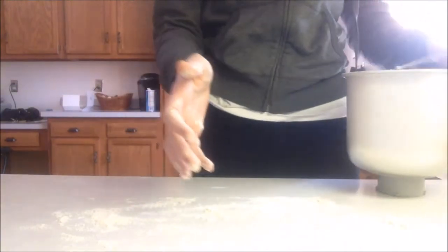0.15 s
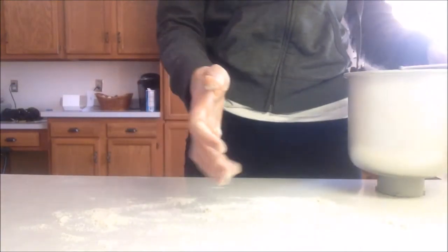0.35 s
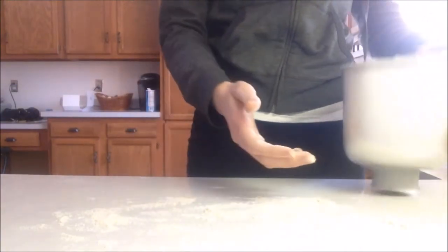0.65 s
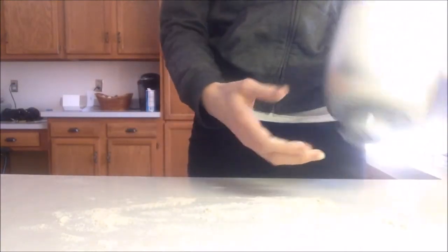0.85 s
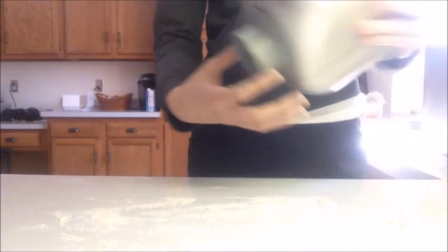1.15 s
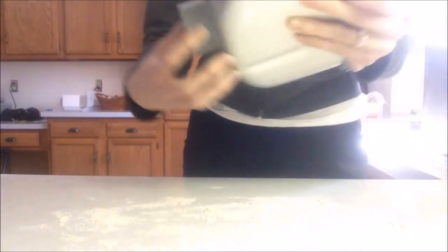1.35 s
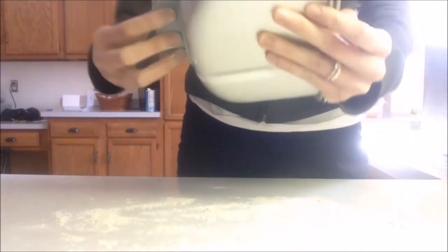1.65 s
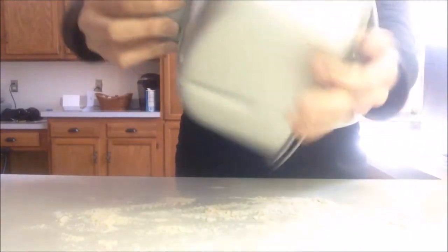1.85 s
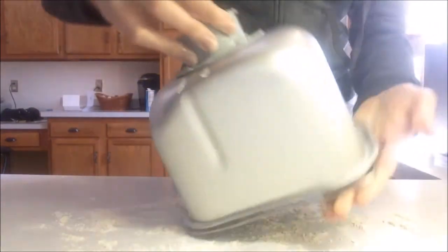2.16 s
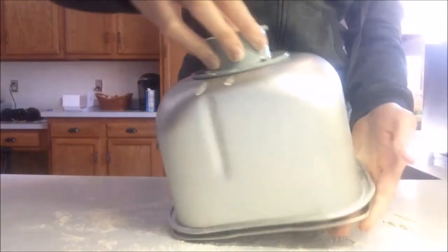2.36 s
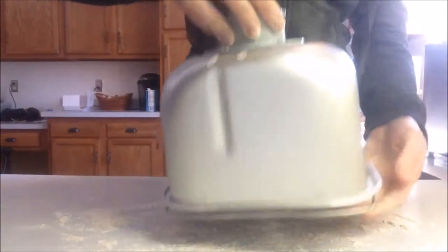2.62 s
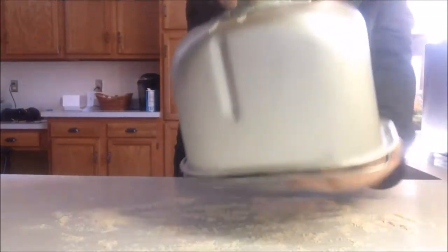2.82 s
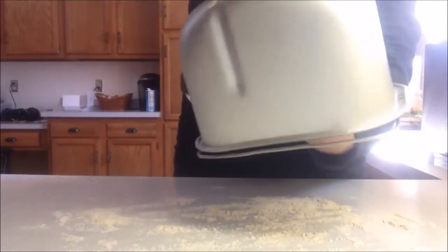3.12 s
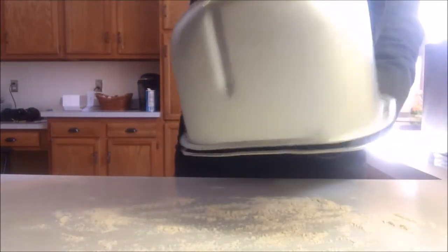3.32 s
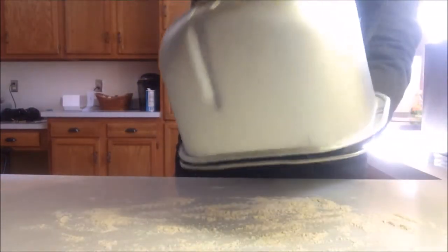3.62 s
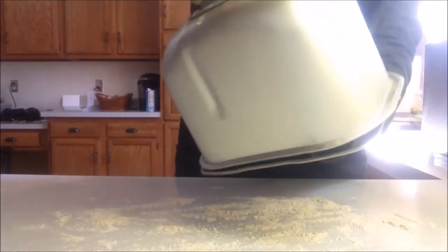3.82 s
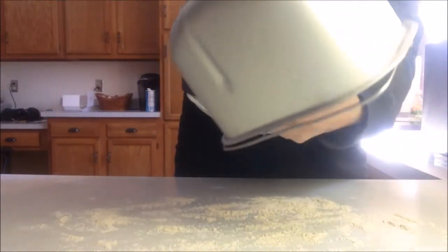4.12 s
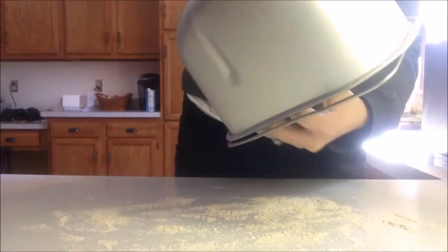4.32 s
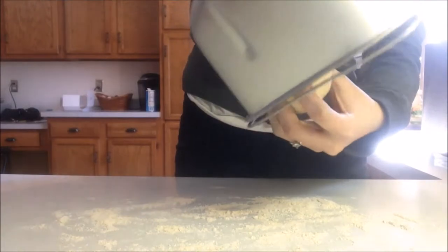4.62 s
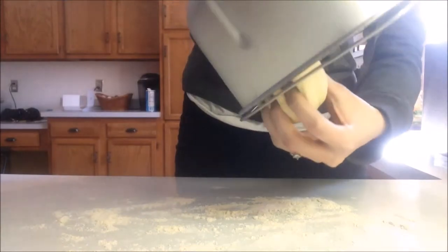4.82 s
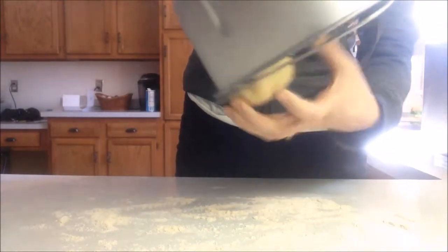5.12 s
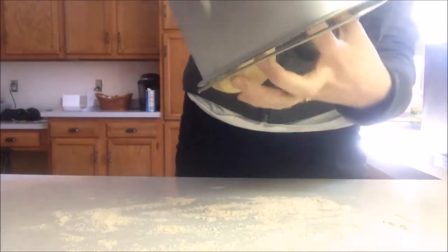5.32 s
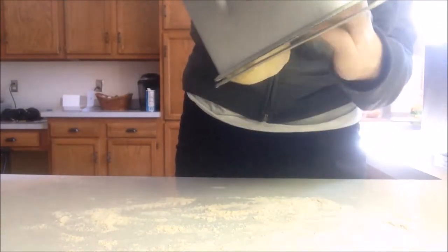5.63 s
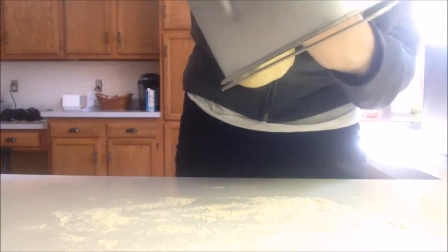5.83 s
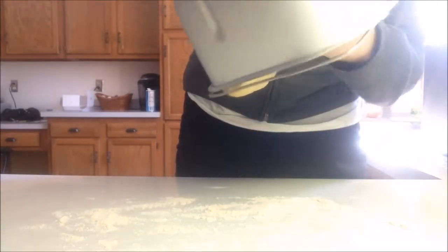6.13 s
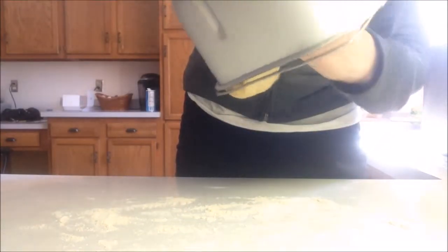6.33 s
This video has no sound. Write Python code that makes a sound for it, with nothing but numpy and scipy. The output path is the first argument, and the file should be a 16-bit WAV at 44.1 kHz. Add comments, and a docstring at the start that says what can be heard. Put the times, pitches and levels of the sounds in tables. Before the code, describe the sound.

Close-miked handling of a hollow metal bread pan: quick booming counter bumps with handle rattle first, soft rubbing and a tiny click, then dry grains of flour sifting in brief waves. A tight run of dull knocks and a short squeaky drag comes next, then near quiet. Finally sharp, ringing knocks and rubs end in soft taps. Steady low motor hum and fan noise lie underneath, in a small lightly reflective kitchen.

```python
"""A small kitchen with a humming appliance: a deep metal bread pan bumps on the counter and is turned over.
Loose flour slides down its wall, the dough slips onto a hand, and fingers work it free with knocks and clunks.
Bumps, knocks and clicks are damped thuds, ringing modes and noise bursts; rubs and short tones are resonant noise.
Flour is dense grains through wall resonances plus hiss; the hum is steady partials over coloured noise.
Diffuse reflections follow all the handling."""
import sys
import numpy as np
from scipy import signal
from scipy.fft import rfft, irfft, next_fast_len
from scipy.io import wavfile

SR = 44100
rng = np.random.default_rng(int(sys.argv[2]) if len(sys.argv) > 2 else 0)


def unload_audio(sound):
    """Save the sound as a 16-bit wav file, at the path given as the first command line argument."""
    columns = np.transpose(np.atleast_2d(sound))
    # keep every value between -1 and 1, then stretch to whole-number steps
    steps = np.round(np.clip(columns, -1, 1) * 32767)
    wavfile.write(sys.argv[1], SR, steps.astype(np.int16))


N = 285327
TIME = np.arange(N) / SR

# metal contact, body of the noise: f/Hz, relative density/dB
CLANK_SPECTRUM = [(350, -21), (900, -5), (1400, -3.5), (2000, -2), (3400, 0), (4500, -4.5), (5300, -15),
                  (7000, -13), (10000, -33)]
# metal contact, bright edge: f/Hz, relative density/dB
TICK_SPECTRUM = [(2000, -6), (4500, -19), (6700, 4), (8500, -8), (11000, -3.5), (15000, -18)]


def from_db(db):
    """Amplitude ratio of a level in dB."""
    return 10 ** (np.asarray(db) / 20)


def rms_one(x):
    """Scale to rms 1."""
    return x / np.sqrt(np.mean(x ** 2) + 1e-20)


def drift(points, size):
    """Random knots joined by straight lines, rms 1."""
    knots = rng.standard_normal(2000)
    return rms_one(np.interp(np.linspace(0, points, size), np.arange(2000), knots))


def flutter(per_s, depth_db):
    """A randomly wandering gain, rms 1."""
    return rms_one(from_db(depth_db * drift(per_s * N / SR, N)))


def noise(spectrum, ripple_db=0, spacing_hz=75):
    """Steady noise of a given colour, rms 1; crowded resonances ripple its spectrum."""
    hz, level_db = np.transpose(spectrum)
    size = next_fast_len(N)
    bins_hz = np.maximum(np.fft.rfftfreq(size, 1 / SR), 1)
    ripple = ripple_db * np.clip(drift(SR / 2 / spacing_hz, len(bins_hz)), -2, 2)
    gain = from_db(np.interp(np.log(bins_hz), np.log(hz), level_db) + ripple)
    gain *= np.minimum(bins_hz / hz[0], 1) ** 2  # falls away below the lowest point
    white = rng.standard_normal(size)
    return rms_one(irfft(rfft(white) * gain, size)[:N])


def clicks(times_s, heights):
    """Single-sample impulses."""
    out = np.full(N, 1e-18)  # tiny offset keeps filters out of denormals
    index = np.clip(np.round(times_s * SR).astype(int), 0, N - 1)
    np.add.at(out, index, heights)
    return out


def decay(times_s, level_db, t60_s, rise_s=0.00085):
    """An envelope that jumps up at each contact and dies away."""
    fall = np.exp(-np.log(1000) / (t60_s * SR))
    rise = np.exp(-1 / (rise_s * SR))
    poles = np.convolve([1, -fall], [1, -rise])
    return signal.lfilter([1 - rise], poles, clicks(times_s, from_db(level_db)))


def crack(times_s, level_db, spectrum, t60_s):
    """Countless short-lived high modes: a noise burst at each contact."""
    return decay(times_s, level_db, t60_s) * noise(spectrum, ripple_db=3.5)


def ring(times_s, level_db, modes, spread_db):
    """Each blow strikes every mode with its own strength; the shifting grip makes the ring uneven."""
    out = np.zeros(N)
    chance = rng.standard_normal((len(times_s), len(modes)))
    for k, (hz, mode_db, t60_s) in enumerate(modes):
        r = np.exp(-np.log(1000) / (t60_s * SR))
        w = 2 * np.pi * hz / SR
        blows = clicks(times_s, from_db(level_db + mode_db + spread_db * chance[:, k]))
        mode = signal.lfilter([0, np.sin(w)], [1, -2 * r * np.cos(w), r * r], blows)
        grip = flutter(per_s=90, depth_db=2.5)
        out += (-1) ** k * grip * mode
    return out


def resonate(x, peaks):
    """Parallel resonances, rms 1."""
    out = np.zeros(N)
    for k, (hz, width_hz, level_db) in enumerate(peaks):
        r = np.exp(-np.pi * width_hz / SR)
        poles = [1, -2 * r * np.cos(2 * np.pi * hz / SR), r * r]
        gain = (-1) ** k * from_db(level_db) * (1 - r * r)
        out += gain * signal.lfilter([1, 0, -1], poles, x)
    return rms_one(out)


def thud(start_s, level_db, hz, swell_ms):
    """A heavily damped flexing: a few cycles that swell and die."""
    out = np.zeros(N)
    at = max(round(start_s * SR), 0)
    t = TIME[:min(SR // 8, N - at)]
    age = t * 1000 / swell_ms
    swell = (age * np.exp(1 - age)) ** 2  # peaks at 1 after swell_ms
    out[at:at + len(t)] = from_db(level_db) * swell * np.sin(2 * np.pi * hz * t)
    return out


def grains(per_s, spread_db):
    """Random tiny contacts of uneven size, rms 1."""
    sizes = from_db(spread_db * np.clip(rng.standard_normal(N), -2, 2))
    signs = rng.choice([-1, 1], N)
    return rms_one(sizes * signs * (rng.random(N) < per_s / SR))


def stroke(start_s, end_s, edge):
    """Envelope of one stroke; it builds and fades over a share (edge) of its length."""
    edge_s = edge * max(end_s - start_s, 1 / SR)
    ramp = np.clip(np.minimum(TIME - start_s, end_s - TIME) / edge_s, 0, 1)
    return np.sqrt(ramp)


def background(air_db=-66):
    """A motor's hum, steady partials of random phase, over soft fan noise."""
    # appliance hum: f/Hz, rms level/dB
    partials = [(59.4, -65), (119.6, -65.5), (177.6, -70.5), (237.5, -80.5), (296.1, -74.5), (355.5, -83),
                (421, -80), (479.5, -81.5), (538.3, -75), (599, -79.5)]
    # room air: f/Hz, relative density/dB
    air_spectrum = [(20, -18), (45, -3.5), (180, 1), (260, -9), (480, -3.5), (640, -7.5), (800, -13),
                    (1050, -17.5), (1400, -23.5), (2500, -26.5), (4300, -28), (5200, -34.5), (6700, -27.5),
                    (9000, -34.5), (15000, -31)]
    hum = np.zeros(N)
    for hz, level_db in partials:
        hum += from_db(level_db) * np.sqrt(2) * np.sin(2 * np.pi * (hz * TIME + rng.random()))
    return hum + from_db(air_db) * noise(air_spectrum)


def counter_bumps(boom_lag_s=0.0018, boom_ms=6.0, clack_ms=3.7, buzz_t60_s=0.3):
    """The foot clacks, the slab booms just after, the pan rocks back, the loose wire handle buzzes on."""
    # foot meets counter: t/s, boom/dB, boom f/Hz, clack/dB, clack f/Hz, rattle/dB, handle/dB
    bumps = [(0.002, -32, 155, -41, 434, -62, -49.5), (0.136, -39.5, 164, -53.5, 720, -83, -87),
             (0.3028, -27, 123, -25.5, 514, -31.5, -43.5), (0.398, -20, 208.5, -24, 736, -50, -52),
             (0.6116, -31, 178, -47, 500, -82, -80), (0.6405, -28, 182, -30.5, 493, -74, -54.5)]
    # counter modes: f/Hz, relative level/dB, t60/s
    counter_modes = [(86, -8, 0.18), (159.4, -6.5, 0.09), (216, -18, 0.18), (328, -17.5, 0.11),
                     (516, -12.5, 0.051), (1020, -24, 0.066)]
    # wire handle resonances: f/Hz, width/Hz, relative level/dB
    handle_peaks = [(763, 60, 9.5), (1285, 140, -0.5), (1600, 140, -4.5), (1934, 89, -3), (2500, 130, -16),
                    (3030, 63, -24), (4140, 230, -48)]
    # rattle noise: f/Hz, relative density/dB
    rattle_spectrum = [(300, -5.5), (1200, -9), (2200, -4), (3200, -8), (4800, -20), (6000, -30.5),
                       (15000, -38)]
    # one rock back per bump, softer and lower
    rock_s, rock_loss_db, rock_pitch = 0.0185, 10, 0.737
    # foot's overtone, level relative to the clack
    foot_hz, foot_db = 1324, -14.5

    s, boom_db, _, _, _, rattle_db, handle_db = np.transpose(bumps)
    out = ring(s + boom_lag_s, boom_db, counter_modes, spread_db=5.0)
    for start, low_db, low_hz, high_db, high_hz, _, _ in bumps:
        for at, loss_db, pitch in [(start, 0, 1), (start + rock_s, rock_loss_db, rock_pitch)]:
            out += thud(at + boom_lag_s, low_db - loss_db, low_hz * pitch, boom_ms)
            out += thud(at, high_db - loss_db, high_hz * pitch, clack_ms)
        out += thud(start + boom_lag_s, high_db + foot_db, foot_hz, clack_ms)
    buzz = decay(s, handle_db, buzz_t60_s) * resonate(rng.standard_normal(N), handle_peaks)
    return out + buzz + crack(s, rattle_db, rattle_spectrum, t60_s=0.049)


def rubbing():
    """Stick and slip shakes the hollow pan, with a rasp and a dry hiss that grows more slowly with pressure."""
    # dough and fingers dragging on metal: start t/s, end t/s, rasp/dB, judder over rasp/dB
    rubs = [(0.508, 0.559, -72.5, 2.5), (0.594, 0.776, -68, -3), (0.783, 0.89, -70, 3),
            (1.305, 1.417, -75.5, 8), (1.422, 1.64, -80, 7), (1.751, 1.85, -55, 3),
            (3.071, 3.13, -48.5, 11.5), (3.12, 3.189, -56.5, 13.5), (3.295, 3.457, -72.5, 10.5),
            (3.52, 3.798, -77, 9.5), (5.152, 5.233, -58.5, 7), (5.507, 5.547, -64, 16.5),
            (5.523, 5.673, -66.5, 6.5), (5.747, 5.814, -52, -7), (5.804, 5.861, -57.5, 11.5),
            (5.929, 6.124, -70, 2.5), (6.114, 6.3, -73, 9.5)]
    # hollow of the pan: f/Hz, width/Hz, relative level/dB
    hollow_peaks = [(448, 57, 5.5), (618, 220, 2), (762, 21.7, 10.5), (957, 45, -5), (1640, 680, -20.5)]
    # rasp noise: f/Hz, relative density/dB
    rasp_spectrum = [(700, -12.5), (1600, 1), (2300, -2.5), (3900, -1.5), (5300, -4), (10000, -18)]
    # dry hiss: f/Hz, relative density/dB
    hiss_spectrum = [(1500, -54), (4000, -1), (7000, 1.5), (9000, -7.5), (13000, -3), (15500, -10.5)]
    # hiss of a light stroke at 0 dB judder, and its rasp level
    light_hiss_db, light_rasp_db = -69.5, -70
    # hiss change in dB per dB of rasp, and loss per dB of judder
    hiss_follows, hiss_stick_loss = 0.33, 0.67

    judder = resonate(grains(per_s=380, spread_db=3.0), hollow_peaks)
    rasp = noise(rasp_spectrum, ripple_db=3.5)
    hiss = noise(hiss_spectrum, ripple_db=2.5)
    out = np.zeros(N)
    for start, end, rasp_db, stick_db in rubs:
        hiss_db = light_hiss_db + hiss_follows * (rasp_db - light_rasp_db) - hiss_stick_loss * stick_db
        drag = from_db(rasp_db) * (rasp + from_db(stick_db) * judder)
        out += stroke(start, end, edge=0.22) * (drag + from_db(hiss_db) * hiss)
    return out * flutter(per_s=70, depth_db=3.5)


def short_tones(width_hz=130):
    """Short rough tones of narrow-band noise: squeaks, a click at 0.797 s, the pan's ring after the 5.76 s knock."""
    # short rough tones: t/s, length/s, level/dB, f/Hz
    tones = [(0.797, 0.0058, -38.5, 3610), (1.344, 0.013, -61, 2130), (1.832, 0.024, -47.5, 7990),
             (1.833, 0.028, -55.5, 2900), (1.837, 0.028, -61, 1960), (2.337, 0.044, -61.5, 1950),
             (3.13, 0.039, -44, 1615), (5.595, 0.036, -56, 1020), (5.761, 0.0141, -30.5, 1560),
             (5.771, 0.074, -45.5, 1610), (6.039, 0.037, -56, 3010), (6.043, 0.045, -56, 4150)]
    out = np.zeros(N)
    for s, length_s, level_db, hz in tones:
        tone = resonate(rng.standard_normal(N), [(hz, width_hz, 0)])
        out += from_db(level_db) * stroke(s, s + length_s, edge=0.89) * tone
    return out


def pan_knocks(bright_db=-3, clank_gain_db=1, tick_by_clank_db=-13, baffle_hz=220):
    """The hand-damped wall thuds and rings low; hard contacts clank, tick and wake the high modes."""
    # blows on the pan: t/s, thud/dB, thud f/Hz, clank/dB (clank_gain_db is the shared clank level), low ring/dB
    knocks = [(0.7978, -52, 756, -54.5, -80), (0.835, -53, 780, -68, -85), (0.956, -57, 770, -71, -74),
              (1.7519, -36, 850, -52, -55.5), (1.799, -53, 700, -52, -71), (1.834, -66, 680, -58.5, -67),
              (2.343, -40, 740, -66, -57.5), (2.361, -51, 970, -82, -70), (3.0733, -34, 708, -50, -62),
              (3.0815, -29, 934, -57, -59), (3.1038, -31, 930, -53, -72), (3.127, -27.5, 792, -48, -65),
              (3.169, -46, 676, -77, -59.5), (3.388, -49, 788, -91, -65), (3.593, -51.5, 770, -73, -75),
              (4.621, -49.5, 566, -62, -68), (5.1871, -30.5, 714, -35, -36),
              (5.1994, -16, 687, -44.5, -34.5), (5.2075, -28.5, 717, -59, -65),
              (5.2127, -30.5, 746, -28.5, -50), (5.366, -30, 163, -64, -49), (5.3704, -15.5, 608, -61, -38),
              (5.3918, -30, 625, -50.5, -68), (5.527, -36.5, 658, -58, -57), (5.660, -48.5, 670, -72, -61),
              (5.7548, -24, 692, -61, -66), (5.7627, -17.5, 520, -35.5, -40), (5.854, -38, 470, -67, -59),
              (6.165, -59, 695, -70, -72), (6.218, -46, 740, -67, -69), (6.229, -44.5, 600, -64.5, -72)]
    # pan modes: f/Hz, relative level/dB, t60/s
    pan_modes = [(368, 0, .22), (405, -1, .18), (518, -5, .22), (564, -7, .22), (736, -1, .18),
                 (1030, -2, .28), (1418, -18, .09), (1620, -14, .17), (1668, -10, .17), (2120, -12, .17),
                 (2290, -15, .1), (2548, -13, .16), (2757, -12, .13), (3065, -12, .11), (3263, -8, .115),
                 (3302, -14, .11), (3530, -10, .07), (3800, -16, .12), (4200, -16, .1), (4519, -13, .13),
                 (6600, -17, .09), (7010, -21, .1)]
    # dent under the blow: pitch ratio, swell ratio, relative level/dB
    DENT = (1, 1, 0)
    # the dent, then a flex of the whole shell: pitch ratio, swell ratio, relative level/dB
    bends = [DENT, (0.55, 1.32, -18)]
    # swell time at firm_db; softer blows are slower, doubling per swell_doubles_db
    firm_db, firm_swell_ms, swell_doubles_db = -25, 3.19, 65

    s, _, _, clank_db, ring_db = np.transpose(knocks)
    low_modes, high_modes = np.split(np.array(pan_modes), [5])
    thuds = np.zeros(N)
    for start, thud_db, hz, _, _ in knocks:
        swell_ms = firm_swell_ms * 2 ** ((firm_db - thud_db) / swell_doubles_db)
        for pitch, slower, bend_db in bends:
            thuds += thud(start, thud_db + bend_db, hz * pitch, swell_ms * slower)
    clank = crack(s, clank_db + clank_gain_db, CLANK_SPECTRUM, t60_s=0.052)
    tick = crack(s, clank_db + tick_by_clank_db, TICK_SPECTRUM, t60_s=0.036)
    low_ring = ring(s, ring_db, low_modes, spread_db=9.0)
    high_ring = ring(s, clank_db + bright_db, high_modes, spread_db=2.0)
    # thin open metal radiates little bass
    baffle = signal.butter(2, baffle_hz, "high", fs=SR, output="sos")
    return thuds + signal.sosfilt(baffle, clank + tick + low_ring + high_ring)


def rim_clicks(t60_s=0.045, clank_by_tick_db=-11):
    """Metal on metal: a bright tick with a little clank and no thud."""
    # clicks on the rim: t/s, tick/dB
    rim_contacts = [(0.7978, -51.5), (5.7542, -33)]
    s, tick_db = np.transpose(rim_contacts)
    tick = crack(s, tick_db, TICK_SPECTRUM, t60_s)
    return tick + crack(s, tick_db + clank_by_tick_db, CLANK_SPECTRUM, t60_s)


def flour(wall_db=-12, sift_db=-0.5, rise_db_per_s=166, fall_db_per_s=98):
    """Each slide gathers quickly and trickles out; fine grains wake the wall's flickering resonances."""
    # slides set off by a tilt or jolt: peak t/s, flow/dB
    slides = [(1.87, -64), (2.06, -71), (2.268, -65.5), (2.419, -64.5), (3.17, -75.5), (3.37, -84.5),
              (3.64, -79)]
    # wall resonances: f/Hz, width/Hz, relative level/dB
    wall_peaks = [(2810, 27, -5), (3490, 86, -8), (4530, 110, 4), (4500, 160, 2), (6070, 47, -3),
                  (6100, 100, -4.5), (6640, 110, -3), (7450, 140, -12)]
    # sifting noise: f/Hz, relative density/dB
    sift_spectrum = [(1200, -6.5), (2700, 0.5), (4500, 1), (5200, -5.5), (7300, 3.5), (8800, -13),
                     (15000, -8)]

    flow = np.zeros(N)
    for s, level_db in slides:
        drop_db = np.maximum(rise_db_per_s * (s - TIME), fall_db_per_s * (TIME - s))
        flow += from_db(level_db - drop_db)
    patter = grains(per_s=3800, spread_db=8.0)
    wall = np.zeros(N)
    for hz, width_hz, level_db in wall_peaks:
        flicker = flutter(per_s=45, depth_db=7.0)
        wall += from_db(level_db) * flicker * resonate(patter, [(hz, width_hz, 0)])
    sift = noise(sift_spectrum, ripple_db=2.5) * flutter(per_s=90, depth_db=1.5)
    return flow * (from_db(wall_db) * wall + from_db(sift_db) * sift)


def kitchen(x, wet_db, t60_s, treble_t60_s, treble_db, gap_s=0.0098, split_hz=2500):
    """Diffuse reflections as decaying noise after a gap; the treble dies sooner."""
    t = TIME[:SR // 2]
    low_pass = signal.butter(2, split_hz, fs=SR, output="sos")
    high_pass = signal.butter(2, split_hz, "high", fs=SR, output="sos")
    low = signal.sosfilt(low_pass, rng.standard_normal(len(t)))
    high = signal.sosfilt(high_pass, rng.standard_normal(len(t)))
    tail = low * np.exp(-np.log(1000) * t / t60_s)
    tail += from_db(treble_db) * high * np.exp(-np.log(1000) * t / treble_t60_s)
    tail *= (t > gap_s) * np.sqrt(2 * np.log(1000) / (t60_s * SR))
    return from_db(wet_db) * signal.fftconvolve(x, tail)[:N]


def scene():
    """Everything done to the pan sounds in the kitchen, over its hum."""
    handling = counter_bumps() + rubbing() + short_tones() + pan_knocks() + rim_clicks() + flour()
    room = kitchen(handling, wet_db=-13.5, t60_s=0.35, treble_t60_s=0.25, treble_db=0.5)
    return (handling + room + background())[None]


def record(dry, cutoff_hz=15400):
    """A steep elliptic low-pass cuts the top."""
    return signal.sosfilt(signal.ellip(10, 0.2, 70, cutoff_hz, fs=SR, output="sos"), dry)


dry = scene()
out = record(dry)
unload_audio(out)
```